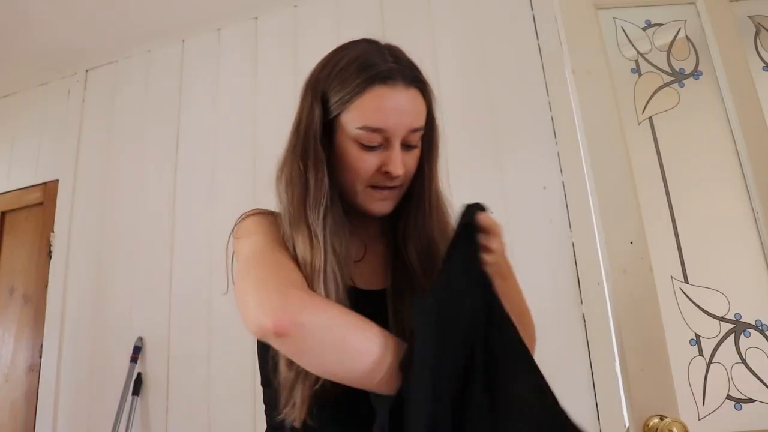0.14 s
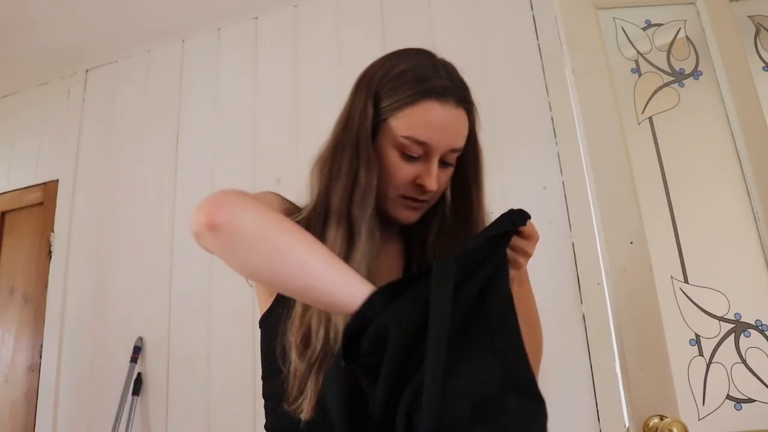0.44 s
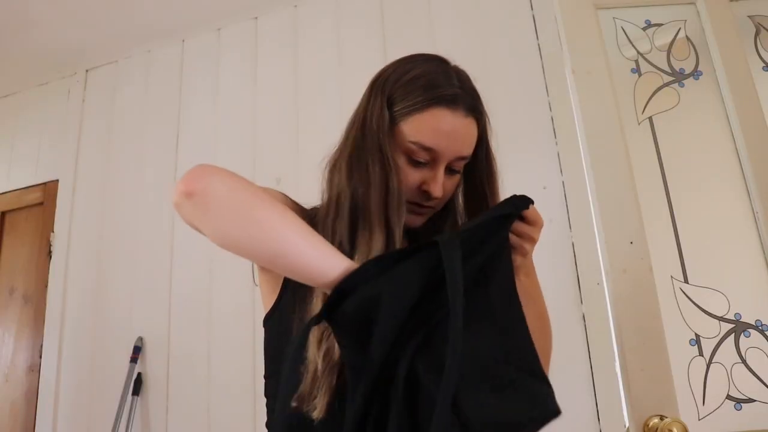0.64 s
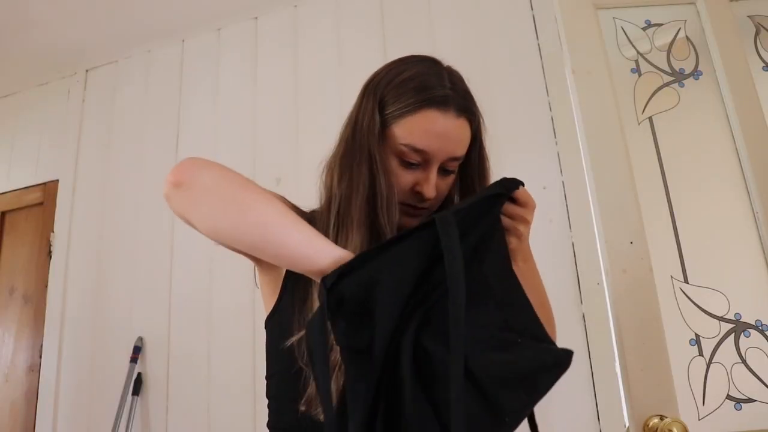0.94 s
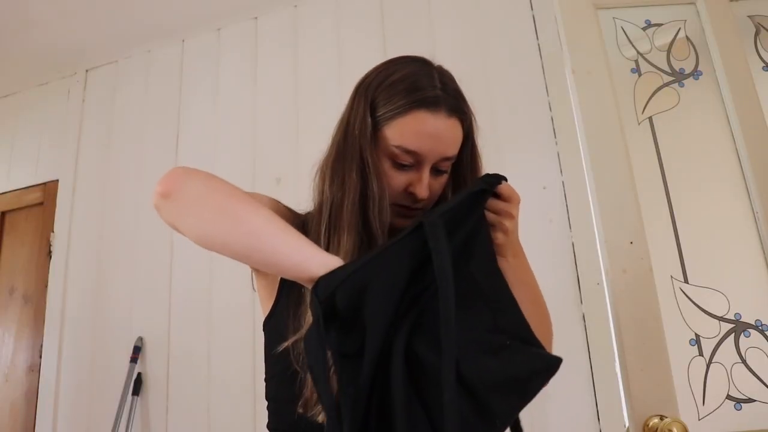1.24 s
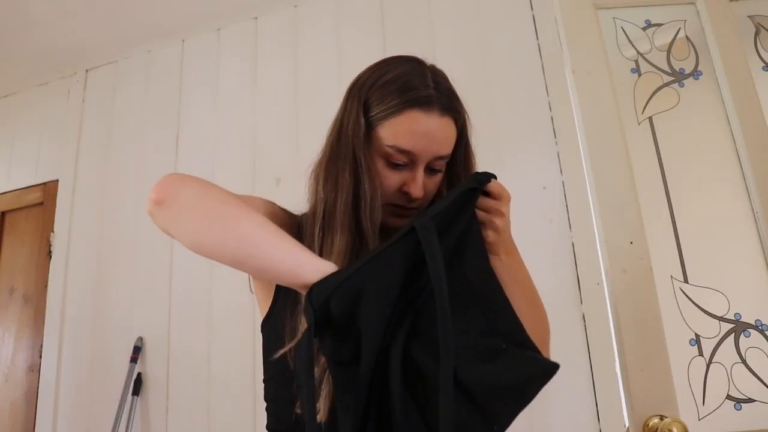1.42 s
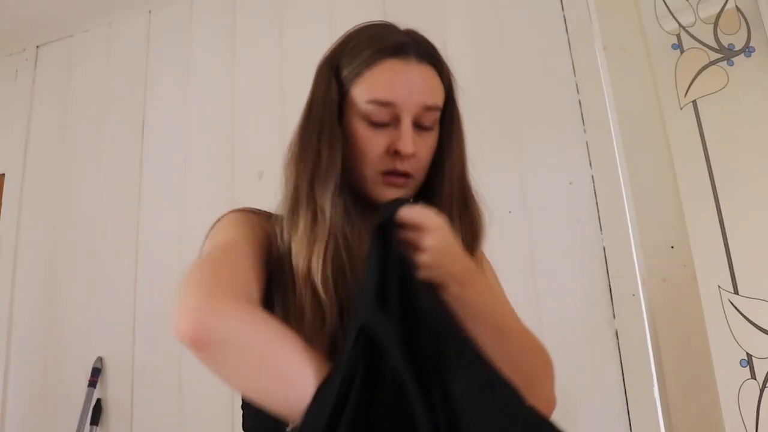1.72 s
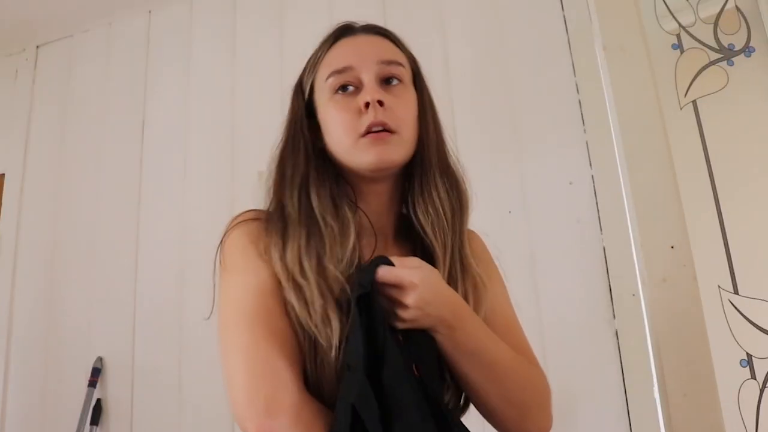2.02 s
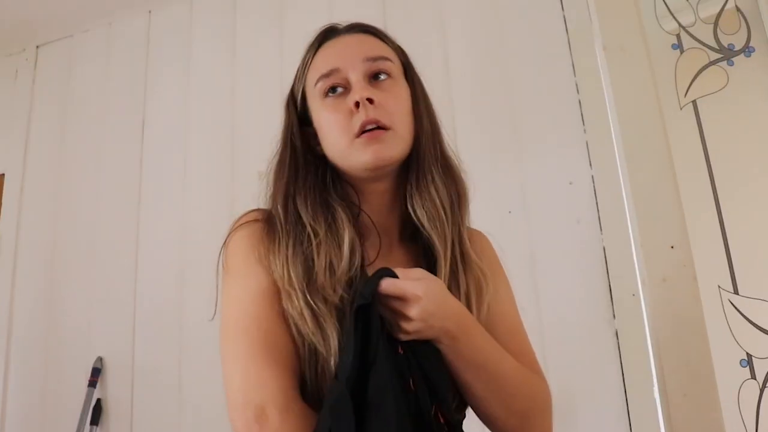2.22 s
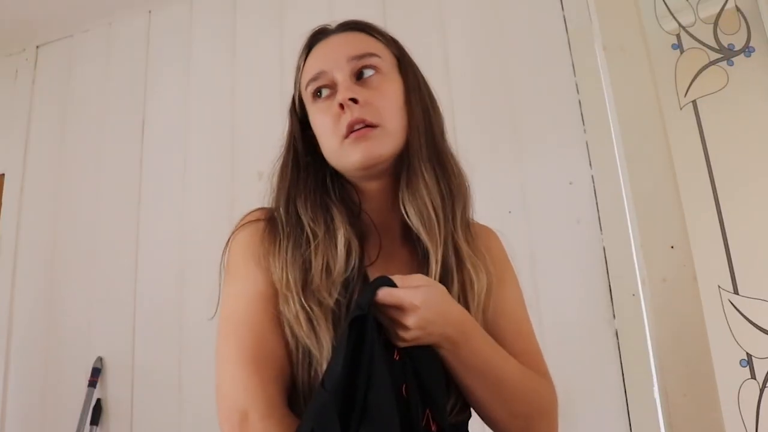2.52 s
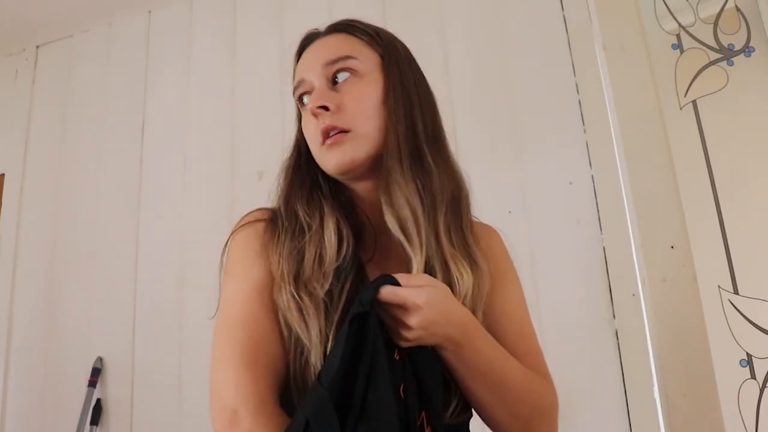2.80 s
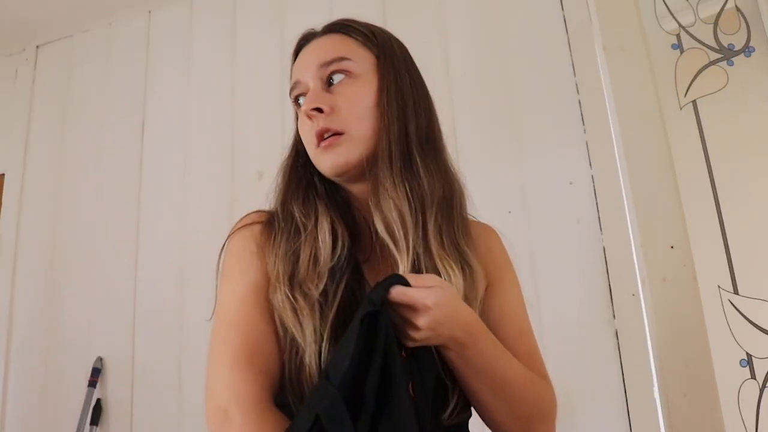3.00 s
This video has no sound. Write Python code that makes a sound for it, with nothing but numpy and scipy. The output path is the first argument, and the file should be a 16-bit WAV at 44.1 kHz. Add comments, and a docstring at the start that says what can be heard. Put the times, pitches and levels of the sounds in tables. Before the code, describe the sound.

A hand rummages briskly in a stiff fabric bag, with scraping cloth and crisp fold snaps, thins to faint ticks, rests, then digs again; close stereo microphones in a bare, lightly echoing room.

```python
"""A hand rummages in a stiff fabric bag before two microphones, in a bare, echoing room.
Cloth drags over cloth: tiny slips scrape, rasp, hiss and flutter, while folds snap as they buckle.
Towards one second the strokes thin out to a few small ticks and soft bumps inside the bag, then a rest.
After a second and a half the hand digs again, with more snaps, ticks and a low bump, to the end.
Wall echoes and a diffuse tail answer throughout, over the steady noise of the still room."""
import sys
import numpy as np
from scipy import signal
from scipy.fft import rfft, irfft
from scipy.io import wavfile
from scipy.ndimage import uniform_filter1d

SR = 44100
rng = np.random.default_rng(int(sys.argv[2]) if len(sys.argv) > 2 else 0)


def bounce(signal):
    """Save signal as a 16-bit WAV file at the path given by the first command-line argument."""
    frames = np.transpose(np.atleast_2d(signal))
    limited = np.clip(frames, -1, 1)
    pcm = np.round(limited * 32767).astype(np.int16)
    wavfile.write(sys.argv[1], SR, pcm)


N = 138915  # samples

# Hand strokes. Each row: fastest moment, rise and fall in seconds, relative scrape, flutter, rasp
# and hiss in dB, pitch of the pocket round the hand in Hz.
HAND_STROKES = [ (0.02, 0.2, 0.017, -45, -53.5, -43.5, -48, 1280),
                (0.124, 0.047, 0.16, -35, -41, -29, -37, 1630),
                (0.204, 0.04, 0.04, -21.5, -39.5, -22, -35, 1650),
                (0.245, 0.03, 0.076, -30.5, -38, -27.5, -34, 1570),
                (0.363, 0.045, 0.031, -28, -43, -25.5, -36, 2500),
                (0.423, 0.016, 0.016, -32.5, -36, -26, -26.5, 2600),
                (0.47, 0.032, 0.024, -26.5, -34, -23.5, -45, 1190),
                (0.53, 0.017, 0.042, -43, -48.5, -36, -40.5, 960),
                (0.63, 0.037, 0.046, -51, -63, -40.5, -41, 890),
                (0.845, 0.034, 0.024, -59, -61.5, -52.5, -48, 1000),
                (0.951, 0.021, 0.029, -55, -53.5, -47.5, -59, 1490),
                (1.27, 0.18, 0.057, -70, -87, -66, -69, 1400),
                (1.55, 0.054, 0.087, -63, -59, -55.5, -68, 1400),
                (1.612, 0.011, 0.02, -35, -39.5, -33, -40, 1600),
                (1.705, 0.0074, 0.0086, -29, -41, -32.5, -31.5, 1650),
                (1.745, .015, 0.18, -52, -55.5, -47, -50, 1700),
                (1.915, 0.025, 0.033, -34.5, -41, -36, -39.5, 1750),
                (1.997, 0.0045, 0.0068, -28.5, -32.5, -42, -37.5, 1200),
                (2.085, 0.094, 0.093, -35, -41, -35, -36, 1730),
                (2.23, 0.034, 0.038, -35, -50, -32.5, -38.5, 1640),
                (2.29, 0.027, 0.015, -29.5, -40, -35, -38, 1420),
                (2.33, 0.033, 0.035, -24, -46, -29.5, -46, 1990),
                (2.388, 0.045, 0.036, -35.5, -56, -34, -35.5, 1760),
                (2.493, 0.021, 0.021, -21.5, -53, -26.5, -34, 2130),
                (2.552, 0.047, 0.051, -29.5, -45.5, -31, -45, 1750),
                (2.622, 0.018, 0.016, -26, -62, -28, -35, 2030),
                (2.642, 0.012, 0.023, -26, -46, -30.5, -36, 1080),
                (2.771, 0.056, 0.087, -38.5, -59, -45, -43.5, 1120),
                (2.867, 0.032, 0.017, -27, -53, -52, -61, 1820),
                (2.96, 0.024, 0.056, -42.5, -51, -41.5, -44, 1810),
                (3.10, 0.063, 0.024, -38.5, -45.5, -39, -50, 1030),
                (3.145, 0.021, 0.025, -38, -52, -37, -37, 1750), ]
STROKE_SHAPE = 1.5  # 1 = pointed swell, 2 = rounded
# Spectra of the parts of the rubbing. Each row: frequency in Hz, relative density in dB per Hz.
SCRAPE_SPECTRUM = [(150, -43.5), (400, -17.5), (720, -6.5), (1000, 0.5), (1300, -10), (1700, 1.5),
                   (2200, -0.5), (2700, -3), (4400, -16), (7000, -15.5), (16000, -40)]
FLUTTER_SPECTRUM = [(30, -33), (90, -14.5), (190, -10), (270, -1.5), (450, -2.5), (700, -1.5), (1200, -13),
                    (3000, -38)]
RASP_SPECTRUM = [(600, -25), (1800, -7.5), (2900, -2.5), (4200, 2.5), (5200, -2.5), (6500, -14.5),
                 (10000, -18), (16000, -19)]
HISS_SPECTRUM = [(1000, -40), (3000, -11), (5500, -0.5), (8200, 2.5), (11000, -4.5), (14000, -5.5),
                 (16000, -17.5)]
POCKET_DB, BROAD_SCRAPE_DB = -5, -2.5  # the ringing and the broad share of the scrape
POCKET_WIDTH_HZ = 680  # of one resonator; the pocket is two in a row
SLIPS_PER_S, SLIP_SPREAD_DB = 9700, 3.5
CLUMP_S, CLUMP_DB = 0.006, 2.5  # the cloth catches and lets go
OWN_CLUMP_DB = 3  # each part of the rubbing also catches on its own
CRACKLES_PER_S, CRACKLE_DB, CRACKLE_SPREAD_DB = 190, -5, 2  # small creases, against scrape and rasp
CRACKLE_LOW_HZ, CRACKLE_HIGH_HZ = 1415, 5900

# Folds that buckle. Each row: start in seconds, relative level in dB, pitch in Hz,
# crumple time in seconds, crispness as treble lift in dB.
FOLD_SNAPS = [ (0.082, -28, 4270, 0.0044, 3), (0.138, -32, 3800, 0.0014, 13),
              (0.1747, -21.5, 2230, 0.0022, -5), (0.2001, -17, 3030, 0.0028, -1),
              (0.224, -23, 2720, 0.0026, 6), (0.2387, -32, 1650, 0.0038, 6),
              (0.3179, -25.5, 2360, 0.0032, 3), (0.4102, -25, 3600, 0.0026, 9),
              (0.4145, -24.5, 3860, 0.0016, 3), (0.4222, -23, 3250, 0.0025, 8),
              (0.455, -28, 4130, 0.0033, 1), (0.4617, -22, 4100, 0.0014, 0),
              (0.4676, -25, 4430, 0.0043, -10), (0.9382, -51, 2840, 0.0025, 0),
              (1.5703, -37.5, 3180, 0.0036, 1), (1.6070, -31.5, 1330, 0.0035, 5),
              (1.6367, -28, 2700, 0.0045, 10), (1.6682, -17.5, 2710, 0.0017, 1.5),
              (1.6968, -32, 2540, 0.0025, 1), (1.9037, -28.5, 1640, 0.0046, 10.5),
              (1.9929, -32, 1540, 0.0026, -9), (1.9976, -32.5, 2200, 0.0014, 6),
              (2.0240, -28, 4460, 0.0014, -1), (2.1602, -33.5, 4100, 0.00075, -7),
              (2.2801, -33, 3660, 0.0026, -2), (2.3086, -18, 3240, 0.00074, -1),
              (2.346, -28.5, 4540, 0.00096, 1), (2.373, -27.5, 6100, 0.0012, -7),
              (2.4773, -19, 3000, 0.003, 3), (2.4876, -24.5, 2300, 0.0014, -4),
              (2.5504, -23, 2160, 0.0035, 1), (2.6116, -29, 2230, 0.0014, -2),
              (2.617, -26.5, 5260, 0.002, -8), (2.6243, -29, 5300, 0.0055, -7),
              (2.6337, -24, 2000, 0.0027, -1), (2.763, -35.5, 6000, 0.0022, -11),
              (2.828, -30.5, 1800, 0.0028, 2), (2.8418, -23, 3600, 0.0035, 1.5),
              (2.9480, -33.5, 1930, 0.0017, 3), (3.09, -37.5, 1800, 0.0035, 0), ]
# Spectrum of a snap or crease. Each row: multiple of its pitch, relative level in dB.
SNAP_SPECTRUM = [(.03, -36.5), (.12, -16.5), (.35, -12.5), (.65, -2), (1, 2.5), (1.35, -5), (2, -14),
                 (3.2, -22), (6, -34.5)]
CRUMPLE_EVENNESS = 0.7  # 0 = patchy spectrum, 1 = smooth

# Small things touching. Each row: start in seconds, relative level in dB.
SMALL_TICKS = [(0.6834, -36), (0.8402, -46.5), (0.859, -52.5), (0.911, -41), (0.9377, -50), (1.4972, -47.5),
               (1.5322, -47.5), (1.5700, -43), (1.871, -43.5), (2.217, -35), (3.134, -43)]
# Spectrum of a tick. Each row: frequency in Hz, relative level in dB.
TICK_SPECTRUM = [(500, -23), (2000, -14), (4000, -8), (6000, -7), (7500, 0), (9500, 1), (12000, -5),
                 (16000, -7)]
TICK_S = 0.0015

# Soft bumps inside the bag. Each row: start in seconds, relative level in dB, pitch in Hz,
# decay in seconds.
SOFT_BUMPS = [(0.687, -37, 346, 0.011), (0.728, -50, 348, 0.014), (0.884, -48.5, 65, .035),
              (1.675, -49, 80.5, 0.036)]
# Spectrum of a bump. Each row: multiple of its pitch, relative level in dB.
BUMP_SPECTRUM = [(.2, -22), (.55, -10), (.8, 0), (1.1, 0), (1.35, -7), (1.8, -18), (4, -28), (12, -55)]

# How long the room rings. Each row: frequency in Hz, time to fall by 60 dB in seconds.
REVERB_TIME = [(100, 0.19), (300, 0.6), (700, 0.6), (980, 0.75), (1350, 0.5), (1800, 0.5), (2400, 0.6),
               (4300, 0.5), (7000, 0.46), (11000, 0.35), (16000, 0.2)]
# Spectrum of the diffuse tail. Each row: frequency in Hz, relative level in dB.
TAIL_SPECTRUM = [(60, -12), (250, -4.5), (680, -1), (980, -1), (1400, 1), (1800, 3.5), (2300, -1.5),
                 (3000, -1), (4300, 0), (8000, 1), (12000, -0.5), (16000, 2)]
# First echoes off the walls. Each row: mean delay in seconds, level in dB against the direct sound.
WALL_ECHOES = [(.0071, -19), (.0100, -47), (.0135, -15.5), (.0168, -39), (.0188, -13), (.0298, -21)]
TAIL_DB, TAIL_GAP_S, TAIL_BUILD_S = 0.5, 0.00042, 0.005
SNAP_ROOM_DB = -2  # snaps and ticks carry straight to the microphones and stir the room less
WALL_SKEW_S = 0.00012  # an echo reaches one microphone first
OFF_CENTRE_S = 0.000016  # the direct sound reaches the right microphone first
PATTERN_S = 0.11  # time before the next echo pattern takes over

# Diffuse sound at the microphone pair. Each row: frequency in Hz, left-right likeness from 0 to 1.
MIC_LIKENESS = [(30, 0.053), (120, 0.22), (260, 0.46), (500, 0.77), (1000, 0.35), (2000, 0), (16000, 0)]
# Balance of the microphone pair. Each row: frequency in Hz, left minus right in dB.
MIC_BALANCE = [(60, 1.5), (600, 1), (1100, 1.5), (2000, -0.3), (7000, -0.5), (10000, -1), (13000, -5),
               (16000, -3)]
EDGE_HZ = 16100  # upper band limit
# Still room. Each row: frequency in Hz, relative density in dB per Hz.
AIR_SPECTRUM = [(15, -51), (25, -19), (80, -9), (141, -6), (185, -8.5), (326, -10), (911, -16.5),
                (1480, -16), (1650, -17), (6050, -21), (16000, -35.5)]
AIR_DB = -55.5


def rubbing():
    """Clumps of tiny slips and crackle swell with each stroke; the pocket round the hand rings."""
    t = np.arange(N) / SR
    power, weighted_hz = np.zeros((4, N)), np.zeros(N)
    for peak_s, rise_s, fall_s, *levels_db, hz in HAND_STROKES:
        side_s = np.where(t < peak_s, rise_s, fall_s)
        swell = np.exp(-(abs(t - peak_s) / side_s) ** STROKE_SHAPE)
        stroke = (amp(levels_db)[:, None] * swell) ** 2
        power += stroke
        weighted_hz += hz * stroke[0]
    pocket_hz = weighted_hz / (power[0] + 1e-30)  # the strongest scrape shapes the pocket
    scrape, flutter, rasp, hiss = np.sqrt(power)

    out = amp(CRACKLE_DB) * np.hypot(scrape, rasp) * crackle()
    ring = resonate(clumped_slips(), pocket_hz, POCKET_WIDTH_HZ)
    ring = resonate(ring, pocket_hz, POCKET_WIDTH_HZ)
    out += amp(POCKET_DB) * scrape * unit(ring)
    parts = [(amp(BROAD_SCRAPE_DB) * scrape, SCRAPE_SPECTRUM), (flutter, FLUTTER_SPECTRUM),
             (rasp, RASP_SPECTRUM), (hiss, HISS_SPECTRUM)]
    for level, spectrum in parts:
        out += level * unit(colour(clumped_slips(), spectrum))
    return catching(CLUMP_DB) * out


def clumped_slips():
    """Dense slips of cloth on cloth, bunched by a catching of their own."""
    return slip_train(SLIPS_PER_S, SLIP_SPREAD_DB) * catching(OWN_CLUMP_DB)


def slip_train(per_s, spread_db):
    """Random clicks of either sign: many small, a few large."""
    sizes = amp(spread_db * np.minimum(rng.exponential(1, N), 4))
    signs = rng.choice([-1, 1], N)
    return sizes * signs * (rng.random(N) < per_s / SR)


def catching(db):
    """Gain of cloth that catches and lets go, 1 at the hardest catch."""
    grip = np.clip(rng.standard_normal(N), -2, 2)
    curve = np.interp(np.arange(N) / SR / CLUMP_S, np.arange(N), grip)
    return amp(db * (curve - 2))


def resonate(x, hz, width_hz):
    """A resonance that follows the curve hz: shift down to zero, smooth, shift back up."""
    turn = np.exp(2j * np.pi * np.cumsum(hz) / SR)
    r = np.exp(-np.pi * width_hz / SR)
    return 2 * (turn * signal.lfilter([1 - r], [1, -r], x / turn)).real


def crackle(count=8):
    """Small creases give way, in groups that each have a pitch of their own."""
    out = np.zeros(N)
    for hz in np.geomspace(CRACKLE_LOW_HZ, CRACKLE_HIGH_HZ, count):
        creases = slip_train(CRACKLES_PER_S / count, CRACKLE_SPREAD_DB)
        out += unit(colour(creases, [(k * hz, db) for k, db in SNAP_SPECTRUM]))
    return unit(out)


def snaps():
    """Stiff folds buckle, each with a broad pitch and a crispness of its own."""
    out = np.zeros(N)
    for s, db, hz, crumple_s, crisp_db in FOLD_SNAPS:
        # the lift grows over the octave above the pitch, then stays
        spectrum = [(k * hz, d + crisp_db * np.clip(np.log2(k), 0, 1)) for k, d in SNAP_SPECTRUM]
        add(out, s, crack(db, crumple_s, spectrum))
    return out


def ticks():
    """Thin, bright ticks of small things touching."""
    out = np.zeros(N)
    for s, db in SMALL_TICKS:
        add(out, s, crack(db, TICK_S, TICK_SPECTRUM))
    return out


def bumps():
    """Dull knocks, cushioned by the cloth."""
    out = np.zeros(N)
    for s, db, hz, decay_s in SOFT_BUMPS:
        spectrum = [(k * hz, d) for k, d in BUMP_SPECTRUM]
        add(out, s, crack(db, decay_s, spectrum, size=4096))
    return out


def crack(db, length_s, spectrum, size=1024):
    """A short, fading run of slips with an evened spectrum; db is its energy as a level over 5 ms."""
    fade = np.exp(-(np.arange(size) / SR / max(length_s, 1e-4)) ** 2 / 2)
    z = rfft(rng.standard_normal(size) * fade)
    slips = fade * irfft(z / (abs(z) + 1e-9) ** CRUMPLE_EVENNESS, size)
    sound = colour(slips, spectrum, size=4096)
    return amp(db) * np.sqrt(0.005 * SR) * sound / np.linalg.norm(sound)


def room(x, send_db, count=4):
    """Sound feeds several random echo patterns in turn, so the tail does not ring at fixed pitches."""
    turn = (np.arange(N) / SR / PATTERN_S).astype(int) % count
    out = np.zeros((2, N))
    for k in range(count):
        feed = x * uniform_filter1d(1.0 * (turn == k), size=200)  # short crossfades
        out += signal.fftconvolve(feed[None], room_response(send_db), axes=1)[:, :N]
    return out


def room_response(send_db):
    """Direct sound, first echoes off the walls and a diffuse tail, at both microphones."""
    t = np.arange(SR) / SR
    hz, frame_s, z = signal.stft(diffuse(TAIL_SPECTRUM, count=SR), SR, nperseg=256)
    decay = np.exp(-np.log(1000) * frame_s / read(REVERB_TIME, hz)[:, None])
    tail = signal.istft(z * decay, SR, nperseg=256)[1][:, :SR]
    tail = tail * np.clip((t - TAIL_GAP_S) / TAIL_BUILD_S, 0, 1)
    response = amp(TAIL_DB + send_db) * unit(tail) / np.sqrt(SR)
    response += np.sinc((t - np.array([[OFF_CENTRE_S], [0]])) * SR - 2)  # direct sound
    for k, (delay, db) in enumerate(WALL_ECHOES):
        delay += WALL_SKEW_S * rng.standard_normal()
        skew = (-1) ** k * WALL_SKEW_S / 2  # the microphones take turns at being first
        response[0, round((delay + skew) * SR)] += amp(db)
        response[1, round((delay - skew) * SR)] += amp(db)
    return response


def still_air():
    """Steady diffuse noise of the still room."""
    return amp(AIR_DB) * unit(diffuse(AIR_SPECTRUM, count=N))


def diffuse(points, count):
    """Stereo noise with the given spectrum, partly alike at both microphones in the bass."""
    hz = np.fft.rfftfreq(count, 1 / SR)
    mid, side = rfft(rng.standard_normal((2, count))) * amp(read(points, hz))
    like = np.clip(read(MIC_LIKENESS, hz), -1, 1)
    mid, side = mid * np.sqrt((1 + like) / 2), side * np.sqrt((1 - like) / 2)
    return irfft([mid + side, mid - side], count)


def amp(db):
    """Decibels to gain."""
    return 10 ** (np.asarray(db) / 20)


def unit(x):
    """Scales to rms 1."""
    return x / np.sqrt(np.mean(x ** 2) + 1e-20)


def read(points, hz):
    """Reads a table on a log-frequency axis."""
    f, value = np.transpose(points)
    return np.interp(np.log(hz + 1e-6), np.log(f), value)


def add(mix, s, sound):
    """Mixes a sound in at time s."""
    part = mix[max(round(s * SR), 0):][:len(sound)]
    part += sound[:len(part)]


def colour(x, points, size=2048):
    """Causal (minimum-phase) filter with the given spectrum."""
    log_gain = np.log(amp(read(points, abs(np.fft.fftfreq(size, 1 / SR)))))
    response = np.fft.ifft(np.exp(np.conj(signal.hilbert(log_gain)))).real
    return signal.fftconvolve(x, response[:size // 2])[:len(x)]


def scene():
    """The bag in the room, over still air."""
    bag = room(rubbing() + bumps(), 0) + room(snaps() + ticks(), SNAP_ROOM_DB)
    return bag + still_air()


def record(dry):
    """The right microphone is the brighter one; then the band limit."""
    tilt_db = read(MIC_BALANCE, np.fft.rfftfreq(N, 1 / SR)) / 2
    heard = irfft(rfft(dry) * amp([tilt_db, -tilt_db]), N)
    low_pass = signal.firwin(511, EDGE_HZ, window=("kaiser", 9), fs=SR)
    return signal.oaconvolve(heard, low_pass[None], "same")


dry = scene()
out = record(dry)
bounce(out)
```